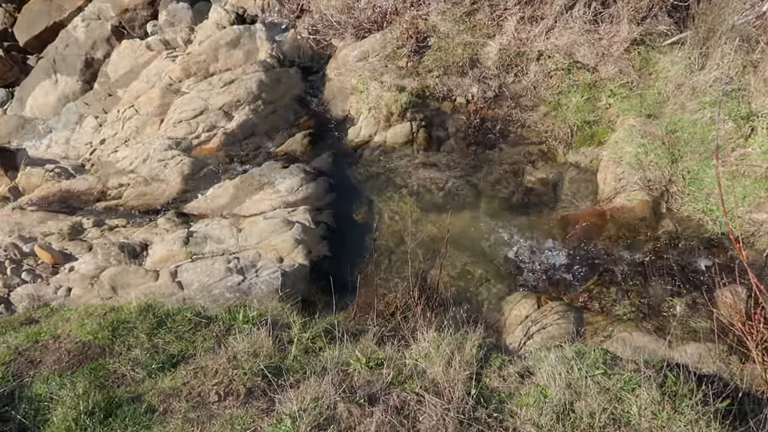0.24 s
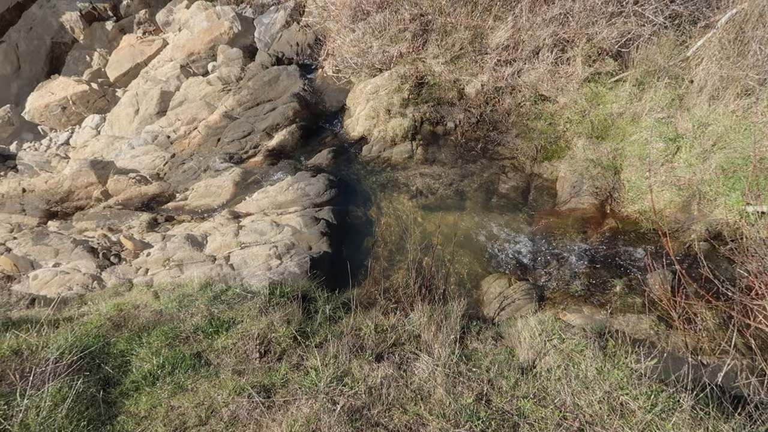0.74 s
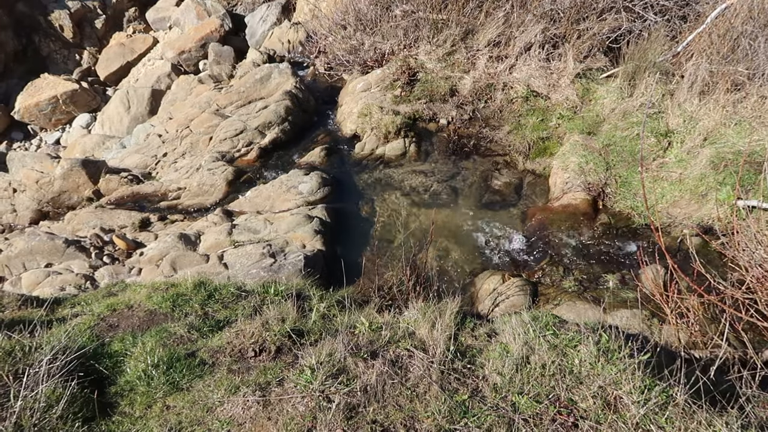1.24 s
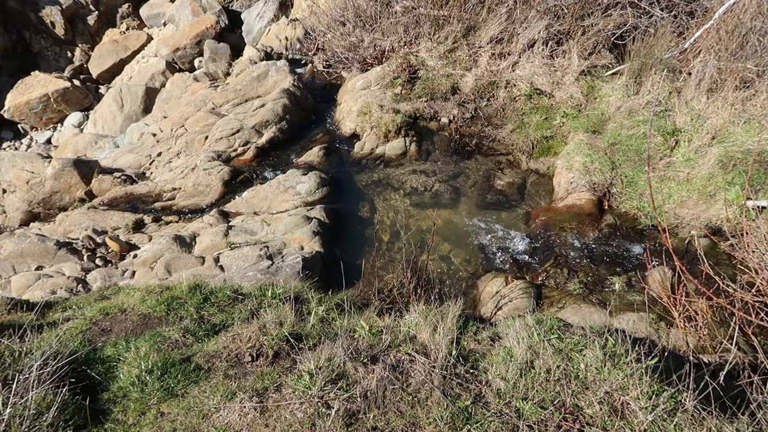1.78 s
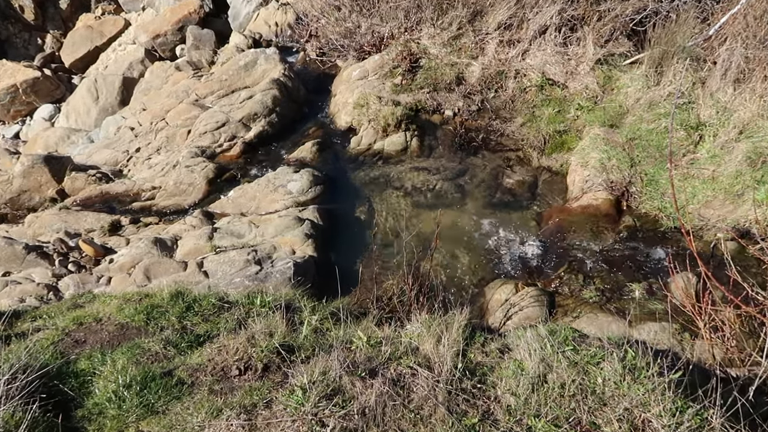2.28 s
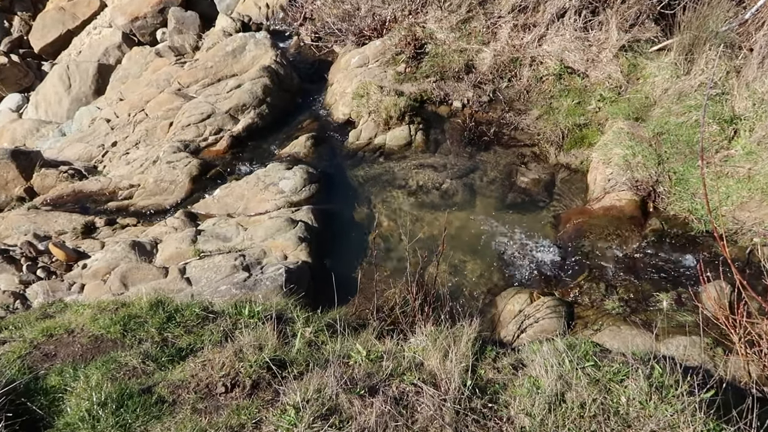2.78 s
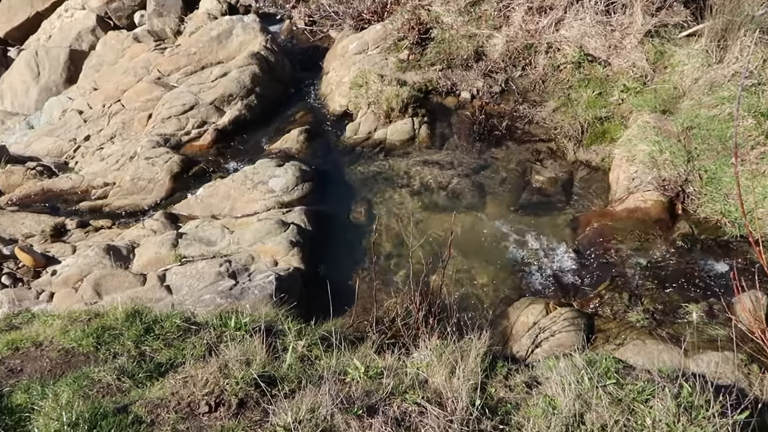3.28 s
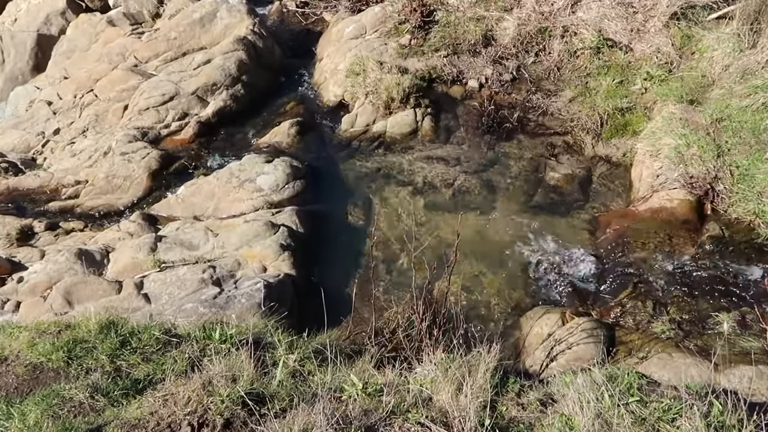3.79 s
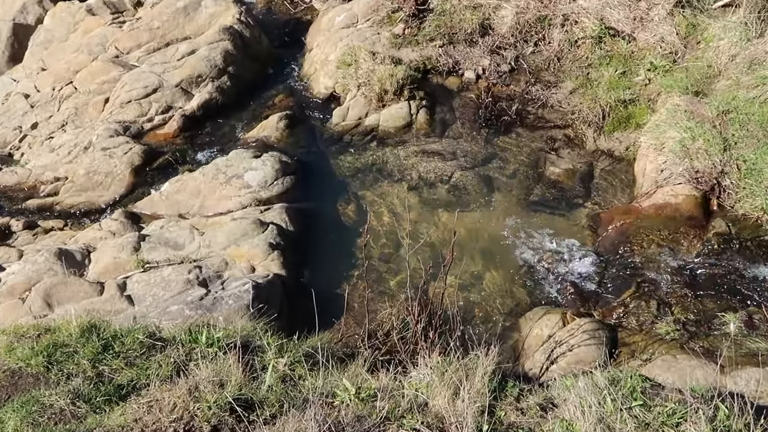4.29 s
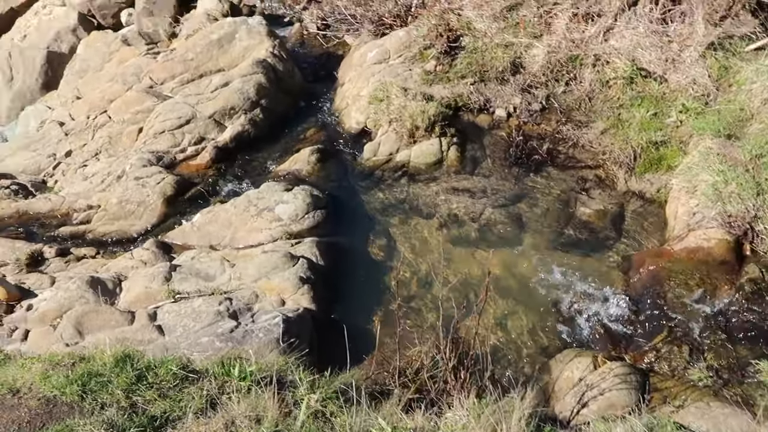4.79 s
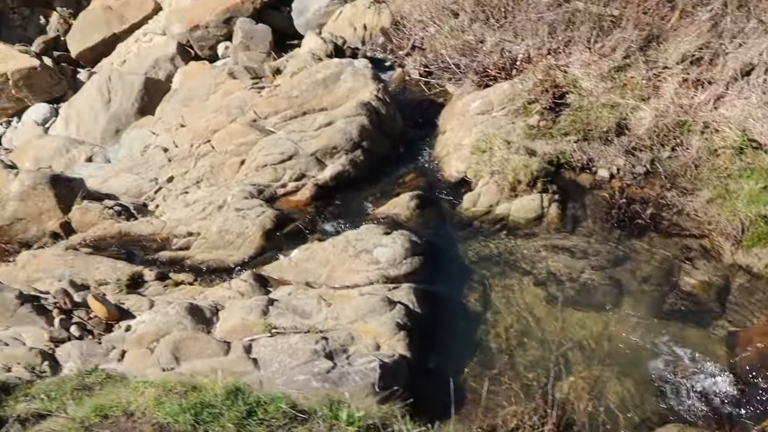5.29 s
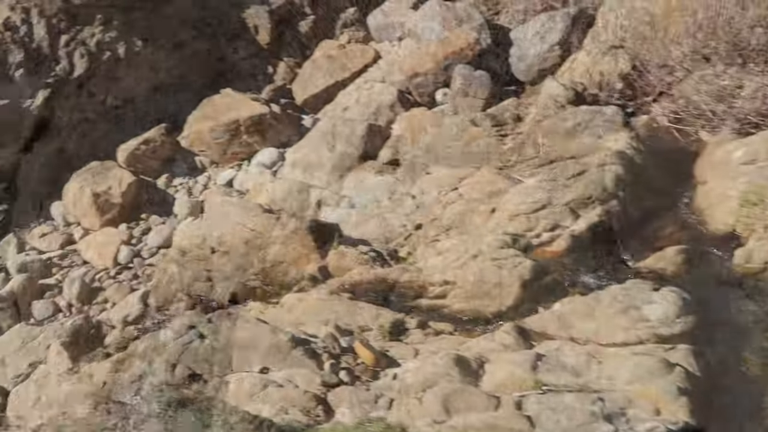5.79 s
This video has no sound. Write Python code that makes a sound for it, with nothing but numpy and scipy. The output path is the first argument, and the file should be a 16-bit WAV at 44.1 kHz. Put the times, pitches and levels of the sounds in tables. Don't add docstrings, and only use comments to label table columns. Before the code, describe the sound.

Small stream trickling into a rocky pool outdoors, crisp drips over a watery rush, low wind buffeting, and a sudden cut with repeated splashing.

```python
import sys
import numpy as np
from scipy import signal
from scipy.fft import rfft, irfft, next_fast_len
from scipy.io import wavfile
from scipy.ndimage import uniform_filter1d, map_coordinates

SR = 44100
rng = np.random.default_rng(int(sys.argv[2]) if len(sys.argv) > 2 else 0)


def decibels_to_gain(level_db):
    exponent = np.asarray(level_db, float) / 20
    return 10 ** exponent


def bounce(signal):
    frames = np.transpose(np.atleast_2d(signal))
    limited = np.clip(frames, -1, 1)
    pcm = np.round(limited * 32767).astype(np.int16)
    wavfile.write(sys.argv[1], SR, pcm)


N = 266584

# [f/Hz, level/dB per Hz]
STREAM = [(88, -14), (150, 22), (393, -2.5), (542, -4), (807, -4), (1130, -12.5), (2080, -18.5),
          (2510, -19.5), (2810, -19.5), (4100, -26.5), (4510, -27.5), (6330, -26), (8100, -27.5),
          (9600, -27), (13800, -33.5)]
# [f/Hz, likeness 0-1]
ALIKE = [(300, 1), (600, 1), (1300, 0.89), (2800, 0.8), (6000, 0.49), (13000, 0.7)]
# [t/s, level/dB over the rush, f/Hz, life/ms]
DROPS = [(.07, 27, 6800, 1.8), (0.29, 23.5, 2730, 4.3), (.988, 23.5, 6660, 1.1), (1.032, 25, 8300, .9),
         (1.203, 24.5, 2800, 2.9), (1.23, 26.5, 2740, 2.6), (1.441, 39, 7330, 1.6),
         (1.468, 32.5, 2730, 3.3), (1.489, 35.5, 9000, 5.4), (1.507, 26, 3480, 3.9), (1.568, 26, 3660, 3.9),
         (1.656, 31, 4700, 1.7), (1.654, 41, 7360, 1.4), (0.482, 20.5, 2030, 5), (2.436, 35.5, 9920, 2.3),
         (2.604, 26, 6360, 5.9), (2.666, 34, 11700, 1.5), (2.764, 29, 7270, 2.3), (2.924, 30, 10000, 0.85),
         (2.963, 26.5, 2940, 3.8), (2.969, 32.5, 11600, 1.5), (3.103, 36, 8500, 1.2),
         (3.215, 37.5, 10600, 0.63), (3.332, 27, 6230, 4.1), (3.404, 24.5, 6600, 3),
         (3.5096, 26.5, 2490, 1.3), (3.5103, 16, 1930, 2.7), (1.654, 34.5, 8940, 1.8),
         (2.046, 15.5, 880, 2.8), (3.507, 20, 4830, 3.4), (1.799, 29, 9200, 2), (2.158, 26, 10240, 2),
         (3.537, 31, 11200, 2.6), (3.592, 35, 8700, 3.8), (3.604, 38, 9600, 1.4), (3.836, 22, 4200, 3.7)]
# [t/s, level/dB over the rush, f/Hz]
PLINKS = [(.279, 16, 2800), (.333, 18, 1880), (0.425, 21.5, 2680), (.451, 11, 5190), (0.5488, 17, 1660),
          (0.666, 16, 5350), (.725, 18, 5600), (0.736, 13, 1610), (0.8126, 13, 2920), (.9157, 23.5, 6070),
          (1.031, 17, 2830), (1.111, 16, 1940), (1.137, 24, 5340), (1.169, 26, 3470), (1.217, 11.5, 2200),
          (1.336, 15, 2410), (1.384, 32, 3530), (1.385, 30, 8800), (1.489, 25, 4200), (1.489, 26, 5600),
          (1.552, 15, 2200), (1.693, 17, 2200), (1.783, 12, 5010), (1.828, 20.5, 5700), (1.911, 23, 3460),
          (2.013, 21.5, 3560), (2.012, 18, 1670), (2.052, 17, 2090), (2.054, 19.5, 2860), (2.131, 20, 7140),
          (2.166, 17, 6100), (2.229, 23, 6160), (2.265, 21, 2830), (2.3422, 19, 1660), (2.345, 10, 6000),
          (2.387, 19, 1690), (2.422, 24, 7240), (2.509, 17, 4150), (2.5302, 12.5, 2150), (2.542, 17, 2380),
          (2.525, 27, 8300), (2.58, 21.5, 8740), (2.7, 16, 2970), (2.762, 23, 4100), (2.786, 25, 4770),
          (2.821, 24, 3380), (2.855, 27, 6900), (2.914, 29, 9800), (2.933, 29, 9180), (2.977, 19.5, 3040),
          (2.977, 23, 6840), (3.0334, 23, 5800), (3.063, 20, 8800), (3.098, 22, 4080), (3.232, 19.5, 2790),
          (3.265, 19, 4760), (3.399, 20, 8900), (3.64, 28, 10300), (3.729, 23, 5540), (3.84, 30, 5400)]
# [t/s, level/dB over the rush, f/Hz]
GURGLES = [(.015, 2, 910), (.247, 7, 503), (.279, 13, 820), (.425, 9, 480), (.55, 14.5, 1210),
           (.722, 5, 1610), (.824, 15.5, 416), (.91, 7, 800), (1.113, 16, 595), (1.424, 16, 600),
           (1.551, 12, 685), (2.017, 14, 680), (2.232, 10.5, 730), (2.475, 10, 715), (2.555, 9.5, 850),
           (2.606, 14, 1450), (2.62, 11, 1500), (2.736, 16.5, 1230), (3.194, 16, 2160), (3.271, -1.5, 1070),
           (3.283, 2, 480), (3.36, 15, 1380), (3.604, 11, 430), (3.637, 8, 460), (3.669, 9.5, 480),
           (3.714, 12, 1010), (3.945, 15, 2150), (3.52, 21, 2900)]
# [t/s, peak level/dB]
SLAPS = [(0.5367, -23), (0.6, -37), (0.789, -32), (1.1667, -68), (1.4857, -46), (1.7984, -66),
         (1.8881, -51), (1.924, -49), (1.99, -51), (2.047, -66), (2.158, -55), (2.25, -38), (2.387, -43),
         (2.437, -39), (2.603, -24), (2.664, -43), (2.765, -39), (2.858, -34), (2.915, -40), (2.962, -38),
         (3.0427, -44), (3.09, -29), (3.213, -45), (3.311, -53), (3.509, -34), (3.603, -52), (3.629, -46),
         (3.7876, -69), (3.8486, -53), (3.8644, -55)]
# [t/s, rumble level/dB]
BREEZE = [(0, -59.5), (.205, -60), (.23, -55), (.3, -37), (.92, -37.5), (1.42, -54), (1.62, -65.5),
          (2.1, -57.5), (2.52, -53), (2.72, -47), (3.2, -46.5), (3.62, -48.5), (3.7, -56), (4.08, -50.5),
          (5.1, -43.5), (5.87, -41.5), (5.95, -47), (6.04, -44)]
# [t/s, likeness 0-1]
SHELTER = [(0, 1), (.38, 0.95), (.44, 0.06), (.5, 0.96), (.85, 0.98), (.92, 0), (1.43, 0.05), (1.46, 1),
           (6.04, 0.98)]
# [f/Hz, level/dB per Hz]
RUMBLE = [(12, -87), (20, -24.5), (145, -7.5), (255, -7.5), (304, -9.5), (398, -14), (475, -33), (700, -49),
          (910, -71), (1540, -120)]
# [t/s, peak level/dB, f/Hz, width/ms]
PUFFS = [(.442, -15, 124, 5.8), (0.561, -23.5, 414, 9.4), (0.909, -11.5, 201, 4.4), (0.954, -10, 173, 1.9),
         (.981, -1.5, 324, 3), (1.007, -17, 238, 9.3), (1.051, -10, 255, 2.4), (1.083, 1, 207, 2),
         (1.103, -8, 145, 6.5), (1.115, -1.5, 276, 2.7), (1.195, -12, 177, 7.3), (1.222, -17, 146, 5),
         (1.298, -7, 260, 3.9), (1.311, -14, 154, 11), (1.345, -7, 138, 11.5), (1.391, -12.5, 200, 2.8),
         (1.506, -28, 166, 5.6), (1.622, -43, 130, 6), (2.301, -31, 171, 10.6), (2.579, -19.5, 175, 2.7),
         (2.683, -15.5, 180, 13), (2.712, -10, 247, 3), (2.731, -15, 328, 2.9), (2.755, -18, 130, 3.5),
         (2.821, -21, 206, 8.5), (2.878, -22.5, 190, 11), (2.975, -24.5, 215, 7.9),
         (3.118, -20.5, 213, 4.5), (3.145, -26.5, 190, 11), (3.605, -33, 232, 1.9), (0.264, -26, 162, 11),
         (1.07, -15, 161, 3.1), (1.182, -10, 150, 3.4), (1.21, -15.5, 190, 3.1), (1.321, -13, 170, 2.7),
         (1.353, -12, 172, 2.6), (1.421, -23, 171, 3.8), (1.441, -31, 151, 5), (2.133, -39, 237, 11),
         (2.694, -15, 190, 5.7), (2.774, -32, 230, 5.5), (2.857, -27, 193, 5.7), (2.938, -25, 120, 4.4),
         (2.959, -23, 160, 5.8), (2.992, -26, 150, 6.8), (3.019, -30, 130, 5.8), (1.129, -13, 270, 5.8),
         (1.234, -25, 170, 4.4), (0.993, -11, 268, 4.4), (1.031, -21, 280, 4)]
# [t/s, gain/dB, suppression/dB, turned away/dB]
PHONE = [(0, -51.5, 3, 7.5), (.205, -53, 1.5, 6), (.225, -43, -2, -4.5), (.44, -39.5, 0.6, -3),
         (.9, -39.5, -1, 1.5), (1.03, -45.5, -3.5, -2.5), (1.08, -43.5, 1, 2.5), (1.13, -51, 10.5, 5.5),
         (1.3, -50, 13, 6.5), (1.36, -49.5, 14, 20), (1.38, -60.5, 19, 14), (1.6, -54, 19, 5),
         (1.7, -54.5, 23, 7.5), (1.97, -51.5, 12, 10.5), (2.21, -46, 14, 13), (2.7, -40, 5, 6.5),
         (3.49, -39, 5.5, 15.5), (3.75, -38.5, 8, 16), (3.82, -36.5, 16, 26), (3.9, -38, 13, 15.5),
         (3.95, -52, 18, 0), (4.25, -47.5, 4.5, 0), (5.0, -41, -0.5, -1.5), (6.04, -38, 2.5, 8)]
# [level/dB over the gain, share of suppression lost, share of turning lost]
BANDS = [
    (0, 0, 0.041),
    (-6.5, 0.87, 0),
    (-6.5, 0.027, 0.27),
    (-9, 0.047, 0.83),
]
EDGES_HZ = [330, 1020, 1780, 4500]
# [f/Hz, width/Hz, level/dB]
SURVIVORS = [(2096, 410, 2), (2776, 116, -5), (4100, 650, -1), (5570, 1400, -6), (8900, 850, -11),
             (11000, 1400, -8)]
# [f/Hz, level/dB re the loud middle]
KEPT = [(5000, -62), (11000, -48), (12300, -45), (15000, -42)]
# [t/s, f/Hz]
CEILING = [(0, 14200), (.2, 13600), (.3, 12700), (1.05, 12000), (2.2, 12000), (2.5, 13200), (3.9, 13300),
           (3.95, 12300), (4.6, 12400), (4.8, 13400), (6.04, 13600)]

CUT_S, BACK_S = 3.912, 2.25224
REPLAY_DULL_DB, REPLAY_DULL_HZ = -5.5, 7150
PLINK_MS, GURGLE_MS = 3.6, 6.1
SPATTER_DB, SPATTER_HZ, SPATTER_MS = (18, 6), (2180, 12400), (0.68, 3.9)
CLUMPS_DB, CLUMPS_PER_S = 1.5, 9
SLAP_DB, SLAP_GROWS, SLAP_T60_S, SLAP_LOW_HZ = 1, 0.38, 0.042, 2940
EVEN_UNDER_DB = 3.5
DEEP_DB, DEEP_GROWS, STRONG_DB = -38.5, 1.38, -35
SWELL_S, SWELL_DB, SWELL_GROWS = 0.028, -29, 0.68
WAKE_S, WAKE_DB, WAKE_HZ, WAKE_MS = .012, -19, 200, 6.8
LEAK_DB = -27
POKES_HZ_PER_DB, FLUTTER_HZ = 110, 600


def creek():
    gain_db, held_db, away_db = curves(PHONE)
    levels_db = [gain_db + over_db - held * held_db - away * away_db for over_db, held, away in BANDS]
    drops = single_drops()
    fizz_level = decibels_to_gain(-14.5 + 0.63 * wobble(4.4))
    fizz = fizz_level * swarm(count=6000, mid_hz=4986, spread=0.551, cycles=20.3, scatter_db=7, size=300)
    splashes = spray(drops) + fizz + drops + slaps(levels_db[-1])
    standout = decibels_to_gain(np.where(after_cut(), -3, 0))
    flat = replayed(water_bed(held_db)) + standout * replayed(splashes)
    levels_db[-1] = levels_db[-1] + CLUMPS_DB * replayed(wobble(CLUMPS_PER_S))
    out = suppressed(flat, levels_db)
    top = filtered(out, lambda f: 1 / (1 + (REPLAY_DULL_HZ / (f + 1)) ** 8))
    return out - after_cut() * (1 - decibels_to_gain(REPLAY_DULL_DB)) * top


def water_bed(held_db):
    gurgle = decibels_to_gain(-15) * swarm(count=2500, mid_hz=2900, spread=0.354, cycles=9, scatter_db=1.5, size=450)
    patchy = rush([(1000, 1.23), (4000, 3.36), (10000, 4.0)], lag_us=31.0)
    bed = decibels_to_gain(0.87 * wobble(8.9)) * patchy + gurgle
    even = 0.68 * np.clip(1 - held_db / EVEN_UNDER_DB, 0, 1) * ~after_even_end()
    return np.sqrt(1 - even) * bed + np.sqrt(even) * rush([(1000, 1.0), (10000, 3.1)], lag_us=32.0)


def rush(patchy, lag_us):
    hz, _, z = signal.stft(rng.standard_normal((2, N)), SR, nperseg=256)
    field = uniform_filter1d(rng.standard_normal(z.shape[1:]), size=5, axis=0)
    field = unit(uniform_filter1d(field, size=6, axis=1))
    patches = decibels_to_gain(along(patchy, hz)[:, None] * field)
    pair = signal.istft(z * patches, nperseg=256)[1][:, :N]
    turn = lambda hz: np.arccos(np.clip(along(ALIKE, hz), -1, 1)) / 2
    mid, side = filtered(pair, lambda hz: np.array([np.cos(turn(hz)), np.sin(turn(hz))]))
    lean = lambda hz: np.exp(1j * np.pi * hz * lag_us * 1e-6 * np.array([[-1], [1]]))
    return unit(filtered(np.array([mid + side, mid - side]), lean))


def single_drops():
    s, db, hz, life_ms = spatter(count=40)
    lag_us = -25 + 25 * rng.standard_normal(len(s))
    level_db = 0.89 * db - 10 * np.log10(life_ms)
    return bubbles(s, level_db, hz, 0.0018 * life_ms * hz, lag_us, rise=0.0089, size=500)


def spatter(count):
    r = rng.random((count, 4))
    span = lambda ends, u: ends[0] * (ends[1] / ends[0]) ** u
    ranges = (SPATTER_DB, SPATTER_HZ, SPATTER_MS)
    faint = np.array([r[:, 0] * CUT_S] + [span(ends, r[:, i + 1]) for i, ends in enumerate(ranges)])
    lesser = [(*row, PLINK_MS) for row in PLINKS] + [(*row, GURGLE_MS) for row in GURGLES]
    return np.hstack([np.transpose(DROPS), np.transpose(lesser), faint])


def bubbles(s, db, hz, cycles, lag_us, rise, size):
    def ring(ch, t):
        t = np.clip(t - 1e-4 - (ch - .5) * lag_us[:, None] * 1e-6, 0, 1)
        age = t * hz[:, None] / cycles[:, None]
        envelope = decibels_to_gain(db[:, None] - 38.0 * age) * (1 - np.exp(-12 * age))
        return envelope * np.sin(2 * np.pi * hz[:, None] * t * (1 + rise * age))
    return laid(s, ring, size)


def swarm(count, mid_hz, spread, cycles, scatter_db, size):
    r, g = rng.random((count, 2)), rng.standard_normal((count, 2))
    hz = np.minimum(mid_hz * np.exp(spread * np.clip(g[:, 0], -2, 2)), 13500)
    db = -scatter_db * np.log(r[:, 1] + .01)
    lag_us = -25 + 30 * g[:, 1]
    return unit(bubbles(r[:, 0] * N / SR, db, hz, cycles + 0 * hz, lag_us, rise=0.18, size=size))


def spray(drops):
    burst = np.abs(filtered(drops[0], lambda f: f > 6000))
    fading = decibels_to_gain(-60 * np.arange(4000) / SR / 0.076)
    mist = signal.fftconvolve(burst, fading)[:N] / 400
    hiss = filtered(rush([(5000, 2.2)], lag_us=10), lambda f: 1 / (1 + (7500 / (f + 1)) ** 8))
    return decibels_to_gain(6.5) * mist * hiss


def slaps(spray_db):
    s, db = np.transpose(SLAPS)
    at = (s * SR).astype(int)
    kicks = np.bincount(at, decibels_to_gain(SLAP_DB + SLAP_GROWS * (db - spray_db[at])), N)
    fading = signal.fftconvolve(kicks, decibels_to_gain(-60 * np.arange(SR // 10) / SR / SLAP_T60_S))[:N]
    hiss = rush([(5000, 1.9)], lag_us=15)
    return fading * filtered(hiss, lambda f: 1 / (1 + (SLAP_LOW_HZ / (f + 1)) ** 4))


def suppressed(flat, levels_db):
    above = lambda hz: [1 / (1 + (edge / (hz + 1)) ** 14) for edge in EDGES_HZ] + [0 * hz]

    def ridges(f):
        peaks = sum(decibels_to_gain(g) / (1 + (2 * (f - c) / w) ** 2) for c, w, g in SURVIVORS)
        return np.where(f < EDGES_HZ[2], 1, 0.3 + peaks)
    depth = np.clip((levels_db[0] - levels_db[1] - 1.5) / 16, 0, 1)
    out = 0
    for k, level_db in enumerate(levels_db):
        band = filtered(flat, lambda hz: decibels_to_gain(along(STREAM, hz)) * np.subtract(*above(hz)[k:k + 2]))
        ridged = filtered(band, ridges)
        out = out + decibels_to_gain(level_db + 1.5) * ((1 - depth) * unit(band) + depth * unit(ridged))
    return out


def wind():
    alike, = curves(SHELTER)
    air = rumble(alike) + replayed(puffs(alike))
    air = air / (1 + np.abs(air / .5) ** 4) ** .25
    low_cut = lambda f: f ** 4 / (f ** 4 + 60 ** 4)
    wind_cut = lambda f: 1 / (1 + (f / 490) ** 12) + decibels_to_gain(LEAK_DB) / (1 + (f / 900) ** 4)
    return filtered(air, lambda f: low_cut(f) * wind_cut(f))


def puffs(alike):
    s, db, hz, width_ms = eddies()
    lag_ms = rng.normal(1.6, 0.3, s.shape) * (1 - alike[(s * SR).astype(int)])
    phase, tilt_db = 2 * np.pi * rng.random(s.shape), rng.normal(0, 1.0, s.shape)

    def push(ch, t):
        t = t - .04 + (ch - .5) * lag_ms / 1000
        swing = 2 * np.pi * hz * t + phase
        swell = np.exp(-(t / (0.00053 * width_ms + 0.1 / hz)) ** 2)
        return decibels_to_gain(db - 1.5 + ch * tilt_db) * swell * (np.cos(swing) + 0.32 * np.cos(2 * swing))
    return laid(s[:, 0] - .04, push, size=3600)


def eddies():
    s, db, hz, width_ms = np.transpose(PUFFS)
    g = rng.standard_normal((len(s), 2, 4))
    wake = [s[:, None] + WAKE_S * (1 + np.abs(g[..., 0])),
            db[:, None] + WAKE_DB + 3 * g[..., 1],
            WAKE_HZ * np.exp(0.33 * g[..., 2]),
            WAKE_MS * np.exp(0.48 * g[..., 3])]
    return np.array([np.append(lead, w) for lead, w in zip((s, db, hz, width_ms), wake)])[:, :, None]


def rumble(alike):
    deep, upper = rumble_levels()
    lumps = decibels_to_gain(1.5 * wobble(29.96))
    below = lambda f: 1 / (1 + (f / 160) ** 8)
    out = 0
    for level, bond, part in ((deep, .5, below), (upper, 0, lambda f: 1 - below(f))):
        turn = np.arccos(np.clip(alike + bond * (1 - alike), 0, 1)) / 2
        a, b = filtered(rng.standard_normal((2, N)), lambda hz: decibels_to_gain(along(RUMBLE, hz)) * part(hz))
        pair = np.array([np.cos(turn) * a + np.sin(turn) * b, np.cos(turn) * a - np.sin(turn) * b])
        out = out + level * replayed(unit(lumps * pair))
    return out


def rumble_levels():
    breeze_db, = curves(BREEZE)
    s, db, *_ = np.transpose(PUFFS)
    kicks = np.bincount((s * SR).astype(int), decibels_to_gain(SWELL_DB + SWELL_GROWS * db) ** 2, N)
    hump = np.exp(-(np.arange(-SR // 4, SR // 4) / SR / SWELL_S) ** 2)
    swell = replayed(np.abs(signal.fftconvolve(kicks, hump, "same")))
    deep = decibels_to_gain(DEEP_DB + DEEP_GROWS * (breeze_db - STRONG_DB))
    return np.sqrt(deep ** 2 + swell), np.sqrt(decibels_to_gain(breeze_db) ** 2 + decibels_to_gain(-0.5) ** 2 * swell)


def thinned(x):
    hz, _, z = signal.stft(x, SR, nperseg=1024)
    noise = rng.standard_normal
    frames = z.shape[2]
    power = np.abs(z) ** 2
    both = power.mean(axis=0)
    wide = lambda v: np.vstack([np.repeat(v, 4, axis=0), v[-1]])
    band = wide(both[:-1].reshape(128, 4, -1).mean(axis=1))
    generosity = decibels_to_gain(5 * unit(uniform_filter1d(noise(frames), size=4)))
    masker = both[(hz > 1000) & (hz < 6000)].mean(axis=0) * generosity
    treble = np.clip((hz[:, None] - 4500) / 4500, 0, 1)
    luck = wide(uniform_filter1d(noise((128, frames)), size=6, axis=1))
    usual = uniform_filter1d(band, size=30, axis=1)
    limit = decibels_to_gain(along(KEPT, hz)[:, None]) ** 2 * masker + decibels_to_gain(-125) ** 2
    limit = limit + treble * usual * decibels_to_gain(-11 + 21 * luck) ** 2
    keep = 1 / (1 + (limit / (band + 1e-20)) ** 6)
    keep = keep / (1 + (.7 * treble * band / (power + 1e-20)) ** 3)
    return signal.istft(z * keep * ceiling(hz, both), nperseg=1024)[1][:, :N]


def ceiling(hz, power):
    bright_db = 10 * np.log10(power[(hz > 6000) & (hz < 12000)].mean(axis=0) + 1e-14)
    lasting_db = uniform_filter1d(bright_db, size=25)
    flutter = unit(uniform_filter1d(rng.standard_normal(len(bright_db)), size=3))
    flutter = flutter * np.clip((lasting_db.max() - lasting_db) / 8 + .3, 0, 1)
    drift_hz = np.interp(np.arange(len(bright_db)) * 512 / SR, *np.transpose(CEILING))
    top_hz = drift_hz + POKES_HZ_PER_DB * (bright_db - lasting_db)
    return hz[:, None] < top_hz + FLUTTER_HZ * flutter


def after_cut():
    return np.arange(N) > CUT_S * SR


def after_even_end():
    return np.arange(N) >= CUT_S * SR


def replayed(x):
    i = np.arange(N)
    return x[..., np.where(after_cut(), i - round(BACK_S * SR), i)]


def laid(s, shape, size):
    k = np.arange(size)
    at = (np.round(s * SR).astype(int)[:, None] + k).ravel()
    return np.array([np.bincount(at, shape(ch, k / SR).ravel(), N + SR)[:N] for ch in (0, 1)])


def unit(x):
    return x / np.sqrt(np.mean(x ** 2) + 1e-20)


def along(points, hz):
    f, v = np.transpose(points)
    return np.interp(np.log(hz + 1), np.log(f + 1), v)


def curves(rows):
    s, *cols = np.transpose(rows)
    return [np.interp(np.arange(N) / SR, s, c) for c in cols]


def wobble(rate):
    knots = rng.standard_normal(int(N * rate / SR) + 4)
    return map_coordinates(knots, [np.arange(N) * rate / SR])


def filtered(x, response):
    m = next_fast_len(N + 8192)
    return irfft(rfft(x, m) * response(np.fft.rfftfreq(m, 1 / SR)), m)[..., :N]


def scene():
    t = np.arange(N) / SR
    jump_db = np.interp(t, [3.9, 3.907, 3.92, 3.932, 3.96], [2, -76, -60, -9.5, 2])
    return decibels_to_gain(jump_db) * (creek() + wind())


def band_limit(x):
    return signal.sosfilt(signal.butter(12, 13900, fs=SR, output="sos"), x)


def record(dry):
    mix = filtered(thinned(dry), lambda hz: 1 / (1 + (hz / 15200) ** 40))
    return band_limit(mix)


dry = scene()
out = record(dry)
bounce(out)
```